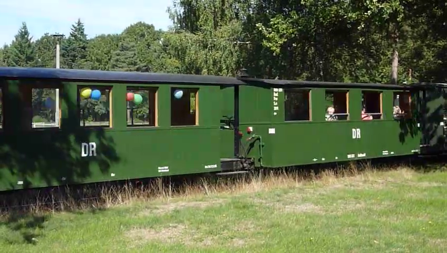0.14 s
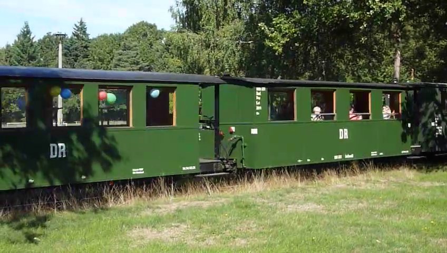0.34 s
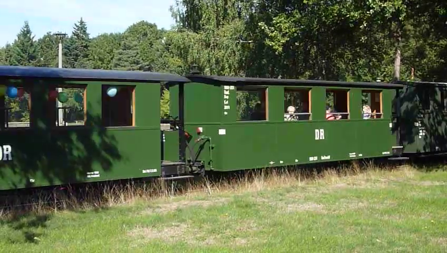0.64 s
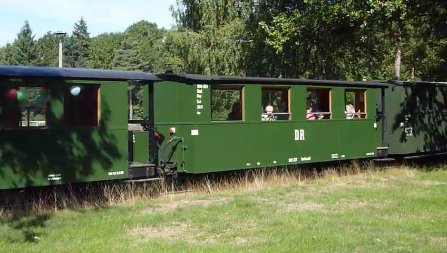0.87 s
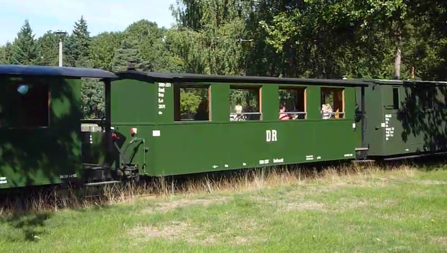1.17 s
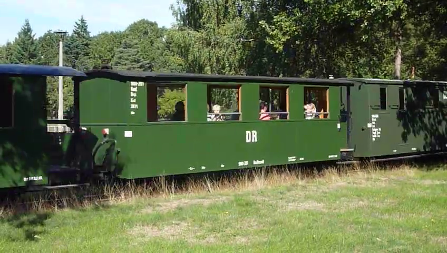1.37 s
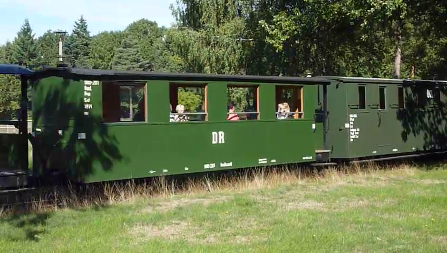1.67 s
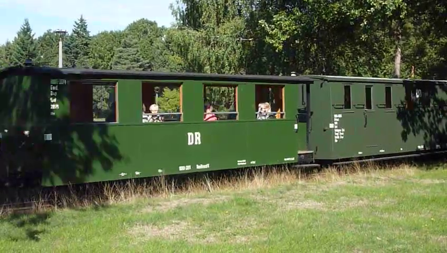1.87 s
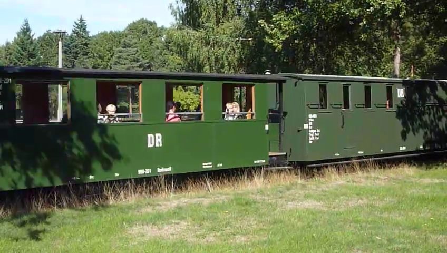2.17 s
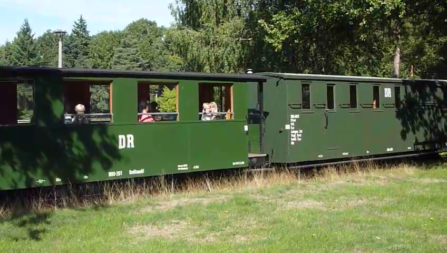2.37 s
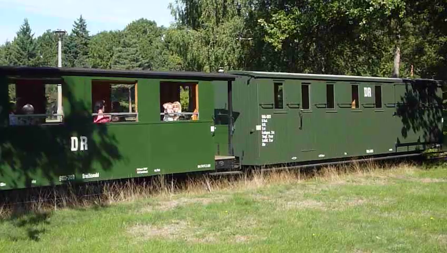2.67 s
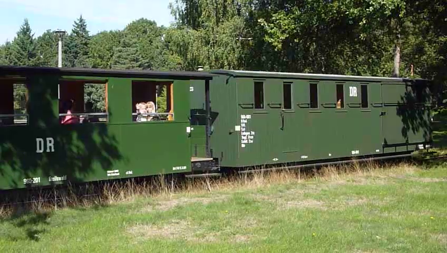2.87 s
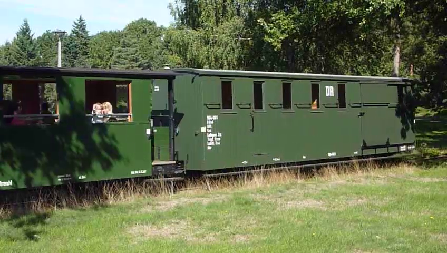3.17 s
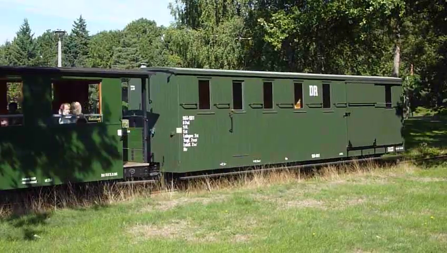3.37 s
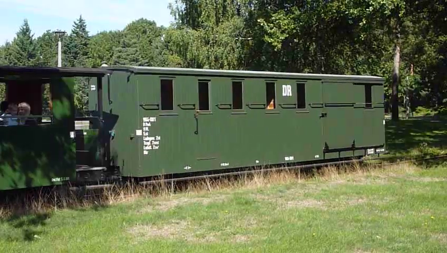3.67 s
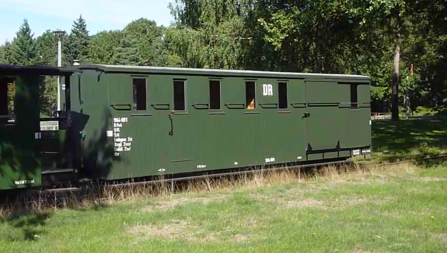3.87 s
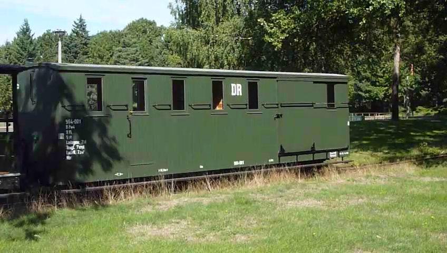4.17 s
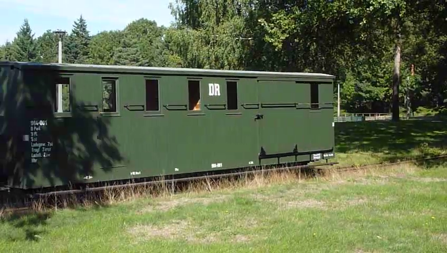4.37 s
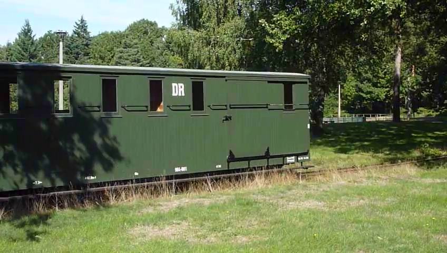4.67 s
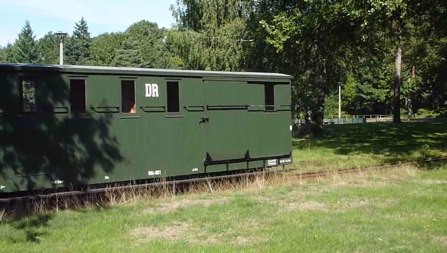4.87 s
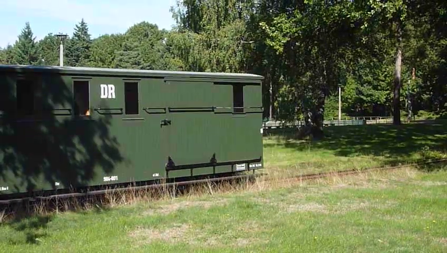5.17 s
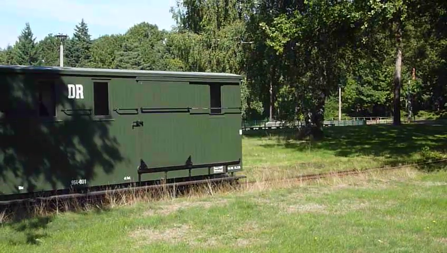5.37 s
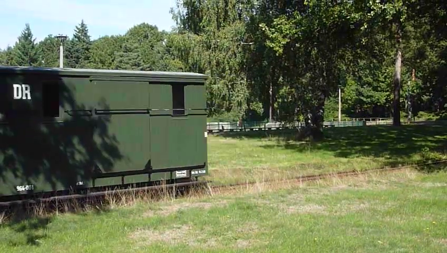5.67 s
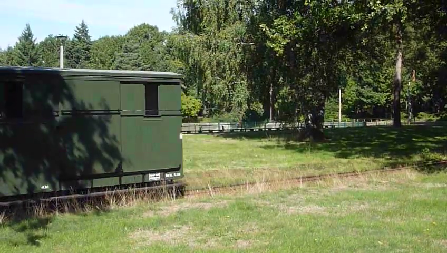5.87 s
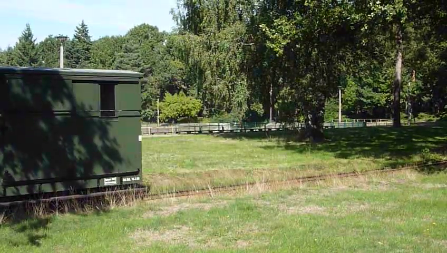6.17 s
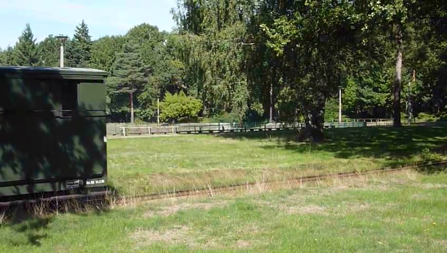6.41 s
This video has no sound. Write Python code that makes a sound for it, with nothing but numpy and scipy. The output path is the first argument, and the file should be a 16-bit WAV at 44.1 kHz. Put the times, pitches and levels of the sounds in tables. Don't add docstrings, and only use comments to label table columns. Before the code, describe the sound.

In a park, coaches roll by with a rough rumble, metallic wheel roar and irregular clacks over rail joints. After a second an air horn sounds one long, fluttering note, swelling to dominate, then stops abruptly with a broken echo from the trees. Wheels keep knocking as the train recedes. Small camera microphone, thin bass and dulled treble.

```python
import sys
import numpy as np
from scipy import signal
from scipy.fft import rfft, irfft, next_fast_len
from scipy.io import wavfile
from scipy.ndimage import uniform_filter1d, map_coordinates

SR = 44100
rng = np.random.default_rng(int(sys.argv[2]) if len(sys.argv) > 2 else 0)


def waveform_to_disk(signal):
    frames = np.transpose(np.atleast_2d(signal))
    scaled = np.clip(frames, -1, 1) * 32767
    samples = np.round(scaled).astype(np.int16)
    wavfile.write(sys.argv[1], SR, samples)


def convert_level_to_amplitude(level_db):
    exponent = np.asarray(level_db, float) / 20
    return 10 ** exponent


N = 288395
OPEN_S, SHUT_S = 1.143, 4.042


def clock():
    return np.arange(N) / SR


def bump(s, half_s):
    return np.exp(-((clock() - s) / half_s) ** 2)


def unit(x):
    return x / np.sqrt(np.mean(x ** 2) + 1e-20)


def along(points, hz):
    f, v = np.transpose(points)
    return np.interp(np.log(hz + 1), np.log(f + 1), v)


def curves(rows):
    s, *cols = np.transpose(rows)
    return [np.interp(clock(), s, c) for c in cols]


def wobble(rate):
    knots = rng.standard_normal(int(N * rate / SR) + 4)
    return map_coordinates(knots, [np.arange(N) * rate / SR])


def turns(hz):
    return 2 * np.pi * np.cumsum(hz) / SR


def filtered(x, response):
    m = next_fast_len(N + 8192)
    return irfft(rfft(x, m) * response(np.fft.rfftfreq(m, 1 / SR)), m)[..., :N]


def patchy(patchy_db, size):
    z = signal.stft(rng.standard_normal((2, N)), nperseg=size)[2]
    field = uniform_filter1d(rng.standard_normal(z.shape[1:]), size=3, axis=0)
    field = uniform_filter1d(field, size=7, axis=1)
    return signal.istft(z * convert_level_to_amplitude(patchy_db * unit(field)), nperseg=size)[1][:, :N]


def rush(spectrum, patchy_db, size=512):
    return unit(filtered(patchy(patchy_db, size), lambda hz: convert_level_to_amplitude(along(spectrum, hz))))


# t/s, level/dB
DRONE = [(0, -38), (.43, -39), (.57, -52), (.64, -45), (.94, -32.5), (1.17, -35.5), (1.35, -38.5),
         (1.64, -42), (1.85, -42), (2.2, -42)]


def drone():
    hum_db, fade = -44, bump(0, 1.2)
    swells = convert_level_to_amplitude(hum_db) * fade + sum(convert_level_to_amplitude(db - 0.5) * bump(s, 0.077) for s, db in DRONE)
    spin = turns(276 + 2.5 * wobble(12) + 4 * wobble(25))
    hum = swells * convert_level_to_amplitude(0.73 * wobble(5.0)) * np.cos(spin)
    third = convert_level_to_amplitude(hum_db + 4 + 3.5 * wobble(14)) * fade * np.cos(3 * spin)
    return hum + third


# near level/dB, far level/dB
LAYERS = [
    (-40, -47.5),
    (-36, -36.5),
    (-32, -42),
    (-41.5, -51),
]
# t/s, level/dB
ROLL = [(0, -0.5), (.38, 2), (.54, 0), (.98, 2), (1.3, 0.5), (1.7, -2), (1.93, 1.5), (2.45, -2),
        (2.64, 2.5), (2.9, -1.5), (3.3, 0.5), (3.8, 1.5), (4.1, -0.5), (4.3, 0), (4.9, 0), (5.5, -0.5),
        (6.1, -1), (6.54, -1.5)]
# f/Hz, level/dB per Hz
RUMBLE = [(15, -86.5), (25, -52), (71, -24.5), (113, -21), (141, -10), (227, -3.5), (361, -5.5),
          (399, -16.5), (500, -0.5), (650, -31), (1100, -120)]
# f/Hz, level/dB per Hz
ROAR = [(150, -23.5), (250, -6), (402, -3), (529, -5), (573, 0.5), (624, -5), (671, 1), (804, -2.5),
        (922, -3), (1100, -7.5), (1400, -10), (1820, -36.5), (3080, -120)]
# f/Hz, level/dB per Hz
RING = [(360, -31.5), (620, -1), (726, -1.5), (786, 0), (823, -3.5), (903, 0), (958, -20), (1120, -6.5),
        (1230, -9), (1410, -11.5), (1590, 0), (1890, -10), (2170, -10.5), (2430, -18.5), (3000, -12),
        (3900, -41), (6600, -120)]
# f/Hz, level/dB per Hz
HISS = [(1180, -33.5), (2000, -6.5), (2560, -8.5), (2940, -12), (3190, -8.5), (4100, -7), (5380, -16),
        (6380, -14.5), (8680, -28), (11300, -79.5), (19100, -120)]


def rolling():
    leave_s = 2.9
    away = clock() ** 2 / (clock() ** 2 + leave_s ** 2)
    rough_db = curves(ROLL)[0]
    rumble_db, roar_db, ring_db, hiss_db = [near + (far - near) * away + rough_db for near, far in LAYERS]
    shake = wobble(9)
    rumble = convert_level_to_amplitude(rumble_db + 1.0 * shake + 0.72 * wobble(4)) * rush(RUMBLE, patchy_db=-2.5)
    roar = convert_level_to_amplitude(roar_db + 0.4 * shake + 0.58 * wobble(30)) * rush(ROAR, patchy_db=2.0, size=1024)
    ring = convert_level_to_amplitude(ring_db + 0.28 * shake + 0.42 * wobble(30)) * rush(RING, patchy_db=2.5, size=1024)
    hiss = convert_level_to_amplitude(hiss_db + 0.73 * shake + 0.32 * wobble(40)) * rush(HISS, patchy_db=1.4)
    return rumble + roar + ring + hiss + drone() * [[1], [0]]


# t/s, peak level/dB, low knock level/dB, t60/s, top level/dB
JOINTS = [(0.3034, -38.5, -5.5, 0.08, -9.5), (0.5358, -31.5, -3, 0.063, 5.5),
          (0.7708, -23.5, -1, 0.08, 0.5), (0.9082, -28.5, -6, 0.046, -2),
          (1.0102, -22.5, -1.5, 0.095, -1.5), (1.3792, -29.5, -3.5, 0.074, -4), (1.6888, -34, -6, 0.08, 1),
          (1.7903, -40, 1, 0.071, -1), (2.138, -34, -4.5, 0.08, -2), (2.398, -40, -3, 0.088, -1),
          (3.2216, -27.5, 1.5, 0.08, 3.5), (3.464, -28.5, -1, 0.08, 2), (4.2756, -25, -2.5, 0.11, -5.5),
          (4.5208, -23.5, -4, 0.094, -4), (5.5125, -36, -5, 0.08, -2), (5.5804, -38.5, 2, 0.08, -8),
          (6.0551, -24, -3.5, 0.091, -3), (6.3024, -24.5, -2, 0.086, 3.5)]
# f/Hz, level/dB per Hz
CLACK = [(180, -35.5), (300, -0.5), (471, -9.5), (781, -2.5), (1410, -11), (1580, -21), (1820, -12),
         (3580, -14.5), (7230, -26), (8680, -46), (11300, -83.5), (19100, -120)]


def joints():
    t = np.arange(SR // 4) / SR
    hz = np.fft.rfftfreq(len(t), 1 / SR)
    below = lambda edge_hz: 1 / (1 + (hz / edge_hz) ** 4)
    low, top = below(1800), 1 - below(5200)
    mid = 1 - low - top
    rise = 1 - np.exp(-t / .0015)
    out = np.zeros((2, N + SR))
    for s, db, low_db, t60_s, top_db in JOINTS:
        balance = convert_level_to_amplitude(low_db) * low + mid + convert_level_to_amplitude(top_db) * top
        colour = convert_level_to_amplitude(along(CLACK, hz) + 12.5 + db) * balance
        rattle = irfft(rfft(rng.standard_normal((2, len(t)))) * colour, len(t))
        knock = convert_level_to_amplitude(-60 * np.maximum(t - .017, 0) / t60_s)
        tail = convert_level_to_amplitude(-17.5 - 60 * t / 0.28)
        out[:, round(s * SR) - 100:][:, :len(t)] += rise * (knock + tail) * rattle
    return out[:, :N]


# t/s, f/Hz, level/dB, t60/s
SQUEAKS = [(.825, 6500, -46, .08), (1.69, 6500, -45, .06), (1.375, 5900, -46, .06), (4.289, 7080, -36, .11),
           (4.29, 2320, -36, .08), (4.29, 4600, -42, .06), (4.299, 3010, -36, .15), (4.275, 2900, -40, .08),
           (4.31, 3600, -43, .2), (4.3, 3850, -46, .3), (4.305, 6680, -45, .16), (4.285, 8750, -48, .1),
           (6.315, 4250, -41, .18), (6.305, 3150, -42, .08), (6.305, 7100, -46, .07),
           (6.058, 3300, -43, .07)]


def squeaks():
    t = np.arange(SR // 4) / SR
    rise = 1 - np.exp(-t / .0015)
    out = np.zeros((2, N + SR))
    for s, ring_hz, db, t60_s in SQUEAKS:
        cycles = ring_hz * t * (1 - .08 * t)
        tone = convert_level_to_amplitude(db - 60 * t / t60_s) * rise * np.sin(2 * np.pi * cycles)
        out[:, round(s * SR):][:, :len(t)] += [[1], [.5]] * tone
    return out[:, :N]


# t/s, level/dB, half width/s
ECHOES = [(4.085, -35, .015), (4.15, -23.5, 0.04), (4.2, -33, 0.017), (4.256, -29.5, .022),
          (4.35, -41.5, 0.086), (4.5, -39, 0.033), (4.6, -37.5, 0.037), (4.8, -39, 0.052)]


def echoes():
    hz = 562 - 10 * bump(SHUT_S + .07, 0.0725) + 1.42 * wobble(15)
    level = sum(convert_level_to_amplitude(db + 3.5) * bump(s, half) for s, db, half in ECHOES)
    return level * convert_level_to_amplitude(2.4 * wobble(40)) * np.cos(turns(hz))


def leak():
    before = clock() - 1.06
    level_db = -32 + 40 * np.minimum(before, 0) - 350 * np.maximum(before, 0) + 3.3 * wobble(21.88)
    hz = 536 + 63 * np.clip(before, -.3, .1) + 7 * wobble(18)
    start = np.clip((before + 0.28) / 0.052, 0, 1)
    return start * convert_level_to_amplitude(level_db + 3) * np.cos(turns(hz))


# t/s, f/Hz
THROB_HZ = [(0, 27.7), (2.5, 27.7), (2.7, 27.54)]
# multiple of the stroke, level/dB, phase/rad
THROB = [(-3, -14, -1), (-2, -6, 1), (-1, -10, -.6), (1, 0, 1.2), (2, 0, -.2), (3, -12, 1.5)]


def throb(hz, note_db):
    early = bump(OPEN_S, 0.89)
    calm_db = -1 * bump(3.98, .07) - note_db
    odd_db = -33.5 + 8.5 * early + calm_db
    even_db = -33.5 + 4.5 * early + calm_db
    lower_db = np.minimum(-0.6 * (hz - 542), 5)
    stroke = turns(curves(THROB_HZ)[0])
    swing = 1
    for k, db, lag in THROB:
        side_db = (odd_db if abs(k) == 1 else even_db) + lower_db * (k < 0)
        depth = convert_level_to_amplitude(side_db + (2.2 - 1.2 * early) * wobble(7))
        swing = swing + depth * convert_level_to_amplitude(db) * np.exp(1j * (k * stroke + lag))
    return swing + convert_level_to_amplitude(-27.5) * (wobble(90) + 1j * wobble(90))


# level/dB, growth with pressure, drift/(dB/s), early chatter/dB, share of gusts
OVERTONES = [
    (-35.5, 0.83, -3.5, -2, 0.36),
    (-32, 1.26, 0, 1.5, 0.96),
    (-36.5, 1.1, -1, -2.5, 0.24),
    (-47, .8, 1, 14.5, .3),
]
# t/s, level/dB, half width/s
GUSTS = [(1.9, 5, 0.027), (2.05, 6.5, 0.077), (2.169, -7, 0.044), (2.3, 4, 0.038), (2.41, -5, 0.045),
         (2.78, -7, 0.023), (2.84, 2, 0.028), (3.55, 5, 0.11)]


def overtones(swing, phase, pressure_db, flicker):
    gust_db = sum(db * bump(s, half) for s, db, half in GUSTS)
    chatter = bump(1.4, .35)
    levels = []
    for db, grows, drift, early_db, share in OVERTONES:
        level_db = db + grows * pressure_db + drift * (clock() - 2.5)
        levels.append(level_db + early_db * chatter + share * gust_db + 0.97 * wobble(9))
    levels += [levels[2] - 16.5, levels[2] - 13]
    bright, scattered = np.zeros(N), np.zeros(N)
    for k, db in enumerate(levels, start=2):
        power = swing ** k / np.sqrt(uniform_filter1d(np.abs(swing) ** (2 * k), size=6000))
        level = convert_level_to_amplitude(db + 1.5 + 1.5 * flicker + 0.49 * k * wobble(60))
        tone = level * power * np.exp(1j * (k * phase + 0.1 * k * wobble(60)))
        bright += tone.real
        scattered += convert_level_to_amplitude(3) * np.real(tone * np.exp(2.5j * wobble(20)))
    return np.array([bright, scattered])


# f/Hz, width/Hz, level/dB, growth with pressure
BELL = [(1618, 32, -39.5, .5), (2715, 75, -48, 0.38)]


def horn_air(swing, pressure_db, valve_db, flicker):
    air = convert_level_to_amplitude(-39.5 + 0.77 * pressure_db + 1.0 * flicker) * rush(HISS, patchy_db=2.2)
    for bell_hz, width_hz, db, grows in BELL:
        resonance = lambda f: 1j * f * width_hz / (bell_hz ** 2 - f * f + 1j * f * width_hz)
        song = unit(filtered(rng.standard_normal((2, N)), resonance))
        level_db = db + grows * pressure_db + np.maximum(valve_db, -60) + 1.0 * flicker
        air += convert_level_to_amplitude(level_db) * song * np.abs(swing)
    return air


# t/s, f/Hz
PITCH = [(1.145, 536), (1.8, 542.5), (2.37, 552.5), (2.95, 554), (3.3, 550), (3.47, 544.5), (3.8, 543),
         (3.93, 558), (4.05, 551)]
# t/s, level/dB
BLAST = [(1.145, -18.5), (1.45, -15.5), (1.72, -10.5), (2.07, -8), (2.45, -9.5), (2.83, -7.5), (3.36, -8),
         (3.8, -11.5), (3.93, -6.5)]
# t/s, level/dB
PRESSURE = [(1.2, -22), (1.7, -4.5), (2.1, -2), (2.56, 4.5), (2.85, -2), (3.8, -5.5), (3.91, 3), (4.04, 2),
            (4.2, -14)]
# t/s, level/dB, half width/s
FADES = [(1.14, -7, .012), (1.81, -3.5, 0.026), (2.53, -4, 0.033), (2.62, -7, 0.037), (3.14, -4.5, 0.14),
         (3.44, -7, 0.057), (3.55, -2.5, 0.085), (3.67, -3.5, 0.042), (4.01, -5, .025), (4.045, -2, 0.032)]


def horn():
    t = clock()
    (hz,), (note_db,), (pressure_db,) = curves(PITCH), curves(BLAST), curves(PRESSURE)
    hz = hz - 5.95 * bump(OPEN_S, 0.0799)
    note_db = note_db + sum(db * bump(s, half) for s, db, half in FADES)
    attack_s, release_s = 0.016, 0.027
    before, after = np.maximum(OPEN_S - t, 0), np.maximum(t - SHUT_S, 0)
    valve_db = -20 * ((before / attack_s) ** 2 + (after / release_s) ** 2)
    pressure_db = pressure_db - 400 * before - 60 * np.maximum(t - PRESSURE[-1][0], 0)
    swing, phase = throb(hz, note_db), turns(hz)
    note = convert_level_to_amplitude(note_db + valve_db + 2.5) * np.real(swing * np.exp(1j * phase))
    flicker = wobble(18)
    rich = overtones(swing, phase, pressure_db, flicker)
    return note * [[1], [0]] + rich + horn_air(swing, pressure_db, valve_db, flicker)


# f/Hz, left-right correlation
ALIKE = [(60, 0.58), (120, 1), (240, 1.0), (490, 1), (1000, 0.99), (2020, 0.87), (4070, 0.27),
         (8230, -0.72)]
# f/Hz, level/dB
LEFT = [(60, .4), (180, 1), (310, 1.2), (530, 1.7), (920, 3), (1600, 6.5), (2760, 7.5), (4760, 8),
        (8230, 10)]
# f/Hz, phase/rad
LEAD = [(60, 0), (550, -.08), (1500, -.1), (2500, .2), (3500, .6), (5500, 1.7), (8000, 2.4)]


def scene():
    direct, scattered = rolling() + joints() + squeaks() + horn()
    direct = direct + leak() + echoes()
    turn = lambda hz: np.arccos(np.clip(along(ALIKE, hz), -1, 1)) / 2
    side = lambda hz: np.outer([1, -1], np.ones_like(hz))
    port = lambda hz: convert_level_to_amplitude(side(hz) * along(LEFT, hz) / 2) * np.exp(.5j * side(hz) * along(LEAD, hz))
    return (filtered(direct, lambda hz: port(hz) * np.cos(turn(hz)))
            + filtered(scattered, lambda hz: port(hz) * side(hz) * np.sin(turn(hz))))


def gain_control():
    duck_s, fall_s, back_s, rise_s, duck_db = 1.455, .45, 4.114, 0.12, -4.5
    times = [duck_s, duck_s + fall_s, back_s, back_s + rise_s]
    return convert_level_to_amplitude(np.interp(clock(), times, [0, duck_db, duck_db, 0]))


# f/Hz, level/dB
EDGE = [(30, -18), (75, 0), (7900, 0), (7990, 10), (8080, -2.5), (8550, -9.5), (8800, -21.5)]
# f/Hz, width/Hz
NOTCHES = [(5430, 140), (7910, 210), (8100, 180)]


def camera(x):
    nulls = lambda hz: np.prod([np.abs(hz - c) / np.hypot(hz - c, w) for c, w in NOTCHES], axis=0)
    return filtered(x, lambda hz: convert_level_to_amplitude(along(EDGE, hz)) * nulls(hz) * (hz < 8840))


def roll_off(x):
    return signal.sosfilt(signal.butter(12, 8830, fs=SR, output="sos"), x)


def record(dry):
    mix = camera(gain_control() * dry)
    return roll_off(mix)


dry = scene()
out = record(dry)
waveform_to_disk(out)
```